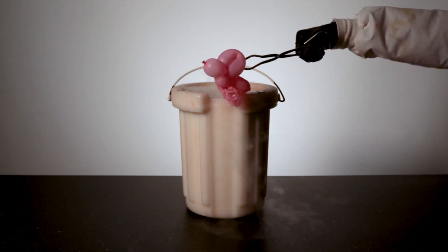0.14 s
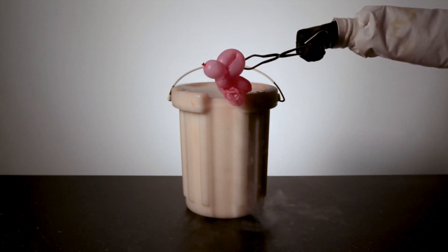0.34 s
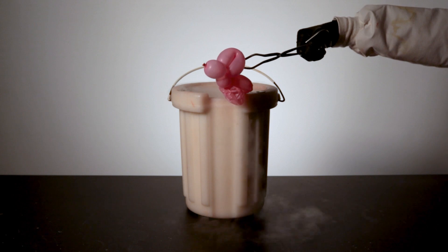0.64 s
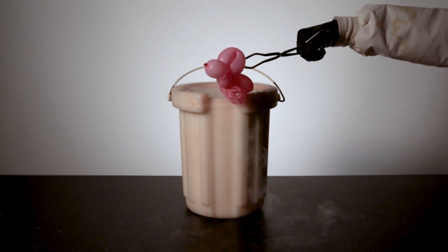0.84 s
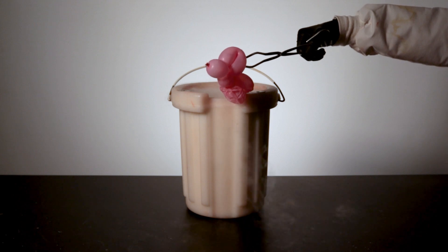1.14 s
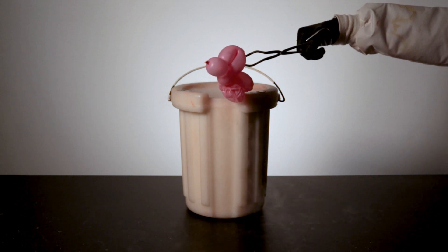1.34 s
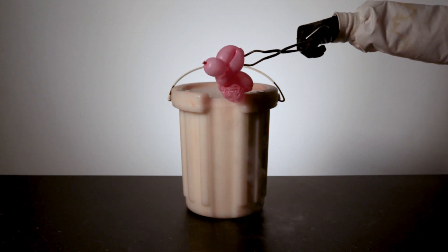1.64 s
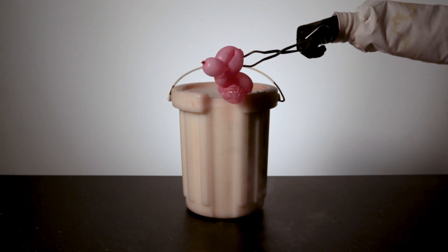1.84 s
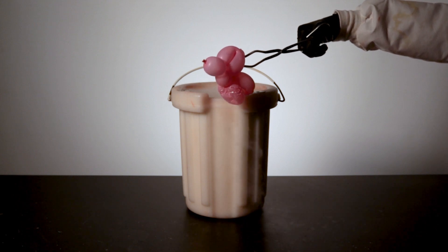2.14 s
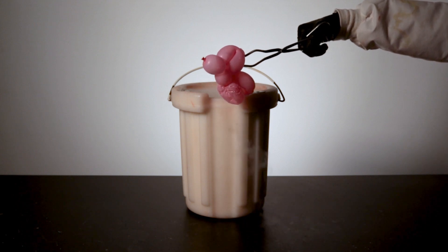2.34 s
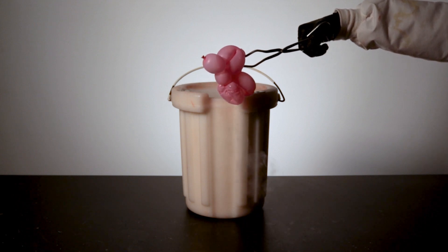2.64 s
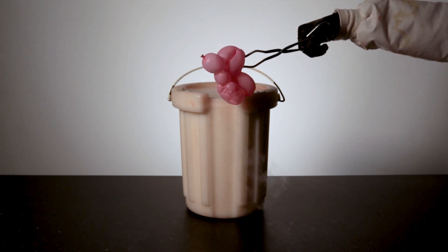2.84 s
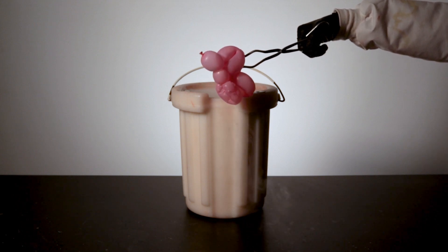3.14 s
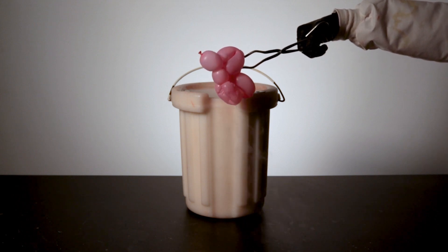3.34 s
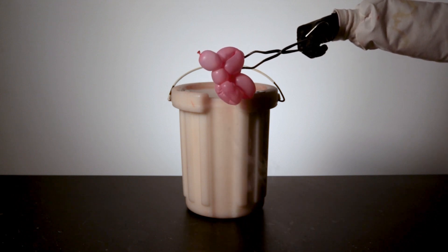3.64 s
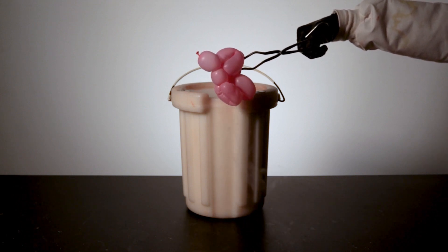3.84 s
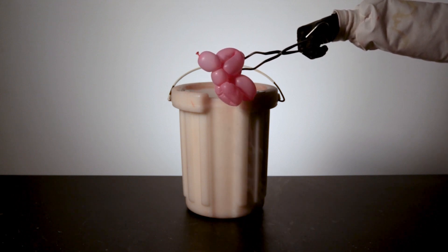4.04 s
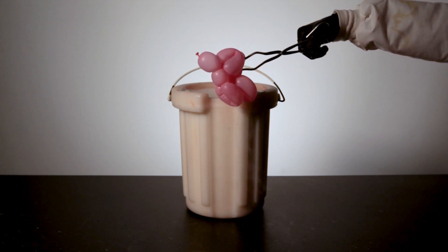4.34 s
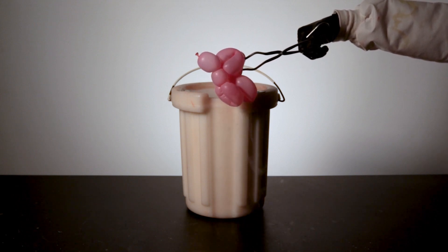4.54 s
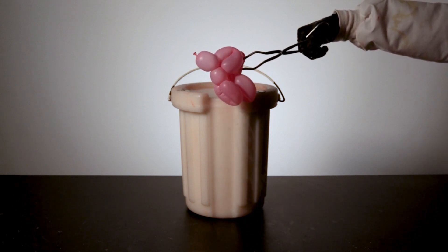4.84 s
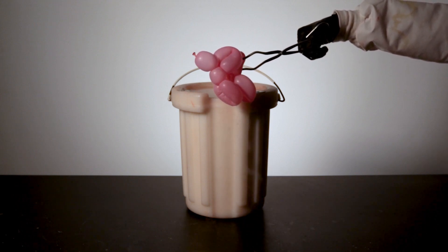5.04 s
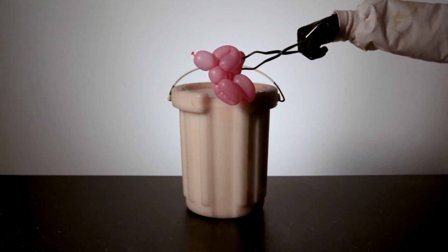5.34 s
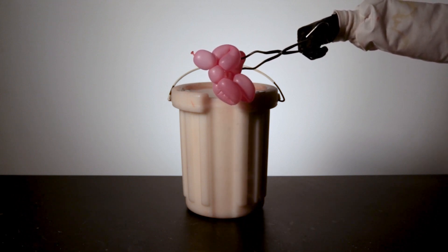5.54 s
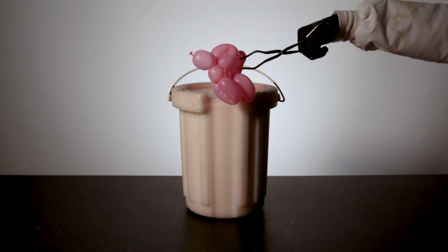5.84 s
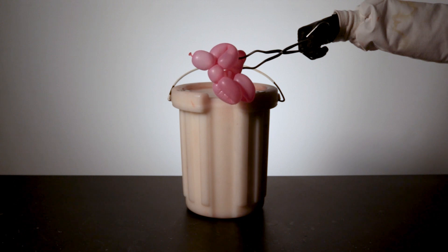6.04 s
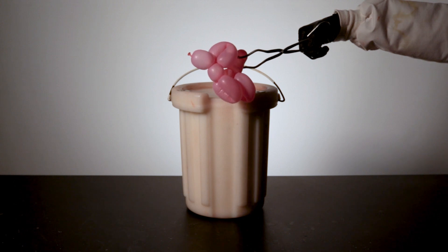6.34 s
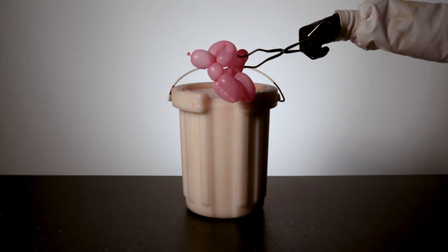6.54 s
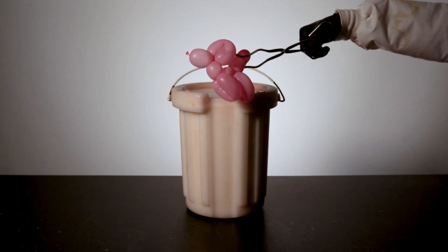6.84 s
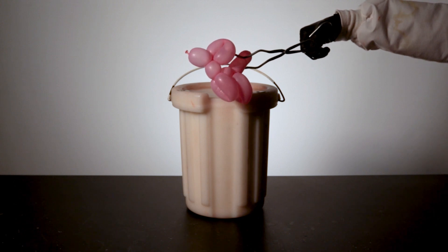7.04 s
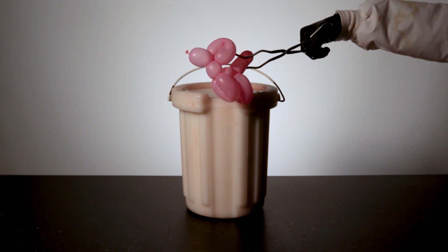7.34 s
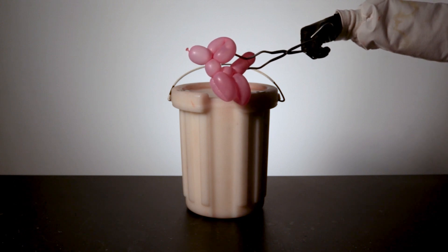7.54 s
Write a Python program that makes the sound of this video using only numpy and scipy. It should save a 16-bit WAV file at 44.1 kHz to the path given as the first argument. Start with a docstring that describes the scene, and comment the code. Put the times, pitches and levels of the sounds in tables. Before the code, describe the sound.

From the start, a frozen rubber balloon thawing over a foam bucket crackles densely: hundreds of tiny, dry, bright ticks per second at uneven levels, with larger snaps on top. Each is very short, a hard jolt with a ragged tear, some pinging high, others knocking duller and lower. From 0 to 2.3 s the snaps are lively; around 2.3 to 2.9 s they cluster louder and sharper. Strong pops continue near 3.35 and 3.84 s, with a busy flurry at 4.55 to 4.65 s and another crisp one at 5.1 s. The fine crackle then thins rapidly. A loud clack stands out at 5.86 s; afterwards only sparse, mostly faint clicks remain, except a very loud snap at 7.28 s, then tiny ticks until about 7.7 s. Quiet distant fan hiss with faint wavering low tones runs steadily underneath. Close stereo, small room, short reflections.

```python
"""A dense, bright crackle over a steady hiss thins out to lone, sharp clicks: a frozen rubber balloon
thaws above a foam bucket on a table top and swells back to shape. Each stiff crease snaps open as a
jolt plus a ragged noise tear, ringing a patch of rubber and coloured by the balloon's lobes.
Blurred first echoes and a diffuse tail make the small room; shaped noise and soft tones make a distant fan."""
import sys
import numpy as np
from scipy import signal
from scipy.fft import rfft, irfft, next_fast_len
from scipy.io import wavfile

SR = 44100
rng = np.random.default_rng(int(sys.argv[2]) if len(sys.argv) > 2 else 0)


def log_audio(samples):
    """Write samples as a 16-bit WAV file to the path given in sys.argv[1]."""
    # one column per channel
    frames = np.atleast_2d(samples).T
    # limit to full scale, then quantise
    limited = np.clip(frames, -1, 1)
    pcm = np.round(limited * 32767).astype(np.int16)
    wavfile.write(sys.argv[1], SR, pcm)


N = 338675

# Snaps that stand out, loud ones and faint late ones; energy before the lobes and the thaw colour them,
# treble is above 6 kHz, thud below: start_s, pitch_hz, energy_db, treble_over_thud_db
SINGLE_SNAPS = [(0.1067, 7540, -10.5, 4), (0.1526, 6000, -13.5, 3.5), (0.176, 8050, -13.5, 26),
                (0.2665, 1500, -18, 2.5), (0.29, 1380, -21.5, -10), (0.351, 4870, -13, 7.5),
                (0.386, 8700, -10, 9.5), (0.414, 2900, -11, 2.5), (0.4422, 9000, -8, 8.5),
                (0.5271, 5900, -13, 10), (0.67, 9350, -16, 9), (0.7114, 5700, -13.5, 9.5),
                (0.773, 2060, -5.5, -1), (1.002, 7340, -11, 20), (1.083, 3400, -10, -11),
                (1.114, 10500, -7.5, 6), (1.147, 10510, -13.5, 10), (1.2017, 9000, -11.5, 13),
                (1.2824, 2700, -12.5, 6), (1.3174, 12450, -8.5, 24), (1.3415, 8500, -10.5, 3.5),
                (1.393, 12400, -14.5, 7), (1.4054, 10500, -15, 5), (1.4462, 11300, -13, 16),
                (1.6, 1840, -7.5, 0.5), (1.7509, 2830, -12.5, 10), (1.8554, 10300, -13, 11),
                (1.8959, 10420, -13.5, 12), (2.077, 8100, -15, 10), (2.0824, 10940, -12, 24),
                (2.092, 7970, -12, 10), (2.291, 12060, -11.5, 7.5), (2.326, 9800, -3.5, 13),
                (2.4313, 3240, -17, -14), (2.5686, 2870, -13.5, -1), (2.6034, 10100, -10, 7),
                (2.6325, 5700, -9.5, 2.5), (2.6669, 5500, -12, 6), (2.7438, 7100, -4, 8.5),
                (2.7715, 6750, -13.5, 1), (2.7973, 6500, -12.5, 0), (2.8204, 9100, -4.5, 31),
                (2.8408, 8400, -8, 5), (2.8801, 4500, -9.5, 7), (2.92, 8000, -10.5, 4.5),
                (3.0675, 5810, -13.5, 0), (3.1343, 9600, -8.5, 10), (3.338, 11600, -12.5, 18),
                (3.3503, 3370, -2, -12.5), (3.3731, 2820, -11.5, 0), (3.5692, 4400, -12.5, 11),
                (3.629, 9100, -10.5, 10), (3.6664, 12600, -9.5, 5.5), (3.6946, 4660, -10, 6),
                (3.7629, 1250, -11, 4.5), (3.8292, 4830, -14, 3), (3.8392, 9500, -3, 11.5),
                (3.8948, 4130, -11.5, 1), (4.0077, 7700, -10, 8.5), (4.0873, 5170, -14.5, 6),
                (4.1409, 10200, -9.5, 9), (4.2061, 7440, -13, 2.5), (4.2378, 7800, -15.5, 7),
                (4.3227, 1460, -12.5, -5.5), (4.3477, 1340, -16, 8), (4.4153, 2730, -16.5, -4),
                (4.4411, 3300, -8, -1), (4.5422, 14380, -16, 7), (4.5677, 13220, -4.5, 20),
                (4.575, 4180, -4, -7), (4.5997, 2880, -8, -19), (4.6239, 2680, -13.5, -8),
                (4.6543, 9350, -5.5, 8.5), (4.6668, 10800, -10, 21), (4.728, 3800, -14.5, -2),
                (4.7469, 4340, -12, 6.5), (4.7821, 2160, -9, 0), (4.8306, 2780, -10.5, 2),
                (4.916, 3700, -9.5, 5), (5.024, 2000, -13, -5), (5.091, 9000, -4.5, 19),
                (5.136, 5200, -20, 3), (5.2279, 4570, -13, 10.5), (5.2465, 8760, -12, 8),
                (5.3183, 12020, -17.5, 8), (5.3793, 8300, -17, 12), (5.408, 9220, -18, 16),
                (5.42, 8010, -18.5, 12), (5.488, 7700, -16.5, 14), (5.5367, 13400, -14.5, 13),
                (5.55, 8900, -15.5, 9), (5.638, 10600, -28, 9), (5.6568, 8780, -27, 6),
                (5.675, 6850, -18.5, 15), (5.724, 9690, -24, 19), (5.7479, 13820, -18.5, 14),
                (5.7609, 11500, -14.5, 16), (5.8307, 3560, -24.5, 2), (5.8596, 2720, -3, 1),
                (5.9086, 4900, -13.5, 7), (5.9757, 9800, -18, 13), (5.982, 5430, -22, 6),
                (5.992, 10900, -17.5, 6.5), (6.092, 8610, -23, 22), (6.176, 6740, -24, 5),
                (6.1893, 5270, -25, 2), (6.2015, 2950, -24.5, 0), (6.2196, 3900, -16, 4.5),
                (6.2278, 10600, -15.5, 21), (6.311, 11710, -24, 7), (6.3175, 3380, -26, 7),
                (6.4073, 10000, -14, 8.5), (6.4465, 2750, -27, 1), (6.4627, 9150, -20.5, 3.5),
                (6.478, 12000, -25, 12), (6.625, 12300, -14, 22), (6.6734, 12450, -16.5, 16),
                (6.6846, 3940, -20, -3.5), (6.715, 9900, -24, 11), (6.7772, 12900, -19.5, 33),
                (6.821, 1770, -29, -3), (6.8707, 2780, -32, 4), (6.9466, 2740, -32.5, 3),
                (6.963, 7940, -26, 11), (7.1091, 4500, -19, -2), (7.1638, 8650, -18.5, 19),
                (7.2036, 1900, -25.5, -3), (7.2807, 3760, 0.5, 3), (7.364, 4940, -22, 6),
                (7.383, 4640, -26, 3), (7.393, 7540, -24, 4), (7.446, 5130, -22, 2.5),
                (7.5058, 12960, -25.5, 19), (7.5206, 5200, -22, 7), (7.558, 5380, -27, 6),
                (7.6034, 5260, -22, 6), (7.6754, 5120, -21, 8.5)]
# Level curve of the small crackle: time_s, level_db
CRACKLE_LEVEL = [(0.0, -42), (0.36, -45), (1.22, -42), (1.45, -44.5), (2.54, -43), (2.76, -42.5),
                 (2.87, -43), (3.27, -41), (4.28, -46), (4.66, -41), (5.18, -50), (5.86, -54.5),
                 (5.99, -56), (6.99, -69), (7.16, -64), (7.34, -65), (7.68, -80)]
# Soft rubber snaps less often and thinner: time_s, creases_per_s, low_band_db
THAW_CURVE = [(4.8, 450., 2), (5.6, 150., 0.5)]
# Low, middle and high band of a snap: from_hz, to_hz
SNAP_BANDS = [(1030, 2500), (2500, 6000), (6000, 15000)]
# How strongly and clearly a patch rings at its pitch: pitch_hz, ring_db, sharpness (centre over width)
PATCH_RING = [(1500, 21, 9.7), (3300, -1.5, 8.5), (6000, 3.5, 6)]
# A large, low-ringing patch puts more of its thud in the lowest band: pitch_hz, low_over_middle_db
THUD_SPLIT = [(1500, 2), (2200, 0.5), (2750, -10), (4500, -9), (6500, -7), (12000, -9.5)]
# Swollen balloon lobes: centre_hz, width_hz, boost_db
LOBES = [(3340, 920, 7), (4340, 520, 8.5)]
# First echoes: delay_s, left_db, right_db
FIRST_ECHOES = [(.0055, -19, -8.5), (.0065, -12.5, -30), (.0081, -14, -17.5), (.0096, -21, -27.5),
                (0.0116, -16, -37), (0.0174, -22, -39)]
# Room tail, energy before its band filter: centre_hz, t60_s, energy_db
ROOM_TAIL = [(1420, 0.21, -3.5), (2750, 0.23, -7), (6800, 0.38, -12.5), (14300, 0.15, -3)]
# Relative spectrum of fan air and hiss: pitch_hz, density_db (per Hz)
FAN_SPECTRUM = [(80, -23.5), (120, -23), (170, -13.5), (300, -5.5), (560, 0), (680, -5), (1270, -13.5),
                (2300, -11.5), (5300, -18.5), (12700, -20.5), (16500, -33)]
# Wavering fan tones, rms before the fan's pan: pitch_hz, width_hz, level_db
FAN_TONES = [(465, 7, -76.5), (584, 13, -70.5), (717, 6, -76)]

# Snap timing: swell, main slip, second slip, rustle
SIZE = 384  # samples in one burst
SWELL_S, SWELL_DB = 0.0012, -7  # length and level of the soft swell that leads into each snap
RISE_S, FALL_S = 0.0003, 0.00055
SLIP_S, SLIP_DB = 0.0009, -4  # typical delay and level of the second slip
AFTER_S, AFTER_DB = 0.002, -13  # decay time and level of the faint rustle
KICK = 1.44  # strength of the clean jolt against the ragged tear

# Snap tone
PURE_RING = 0.6  # ring dB gained per dB of treble below the thud
PURE_TILT = 0.23  # dull snaps are purer rings: low band dB gained per dB of treble
OVERTONE, OVERTONE_DB = 1.81, -9.5  # second ring of a large patch: pitch ratio, level
OVERTONE_TILT = 0.44  # second ring dB gained per dB of treble
LARGE_HZ = 4500  # patches that ring above this lose the second ring
DULL_HZ = 8100  # dull snaps fall off above this

# Snap placement
PAN_DB, PAN_SPREAD_DB = -1, 2.1  # left over right: mean, spread
PLACES = 5  # spots on the balloon, each with its own path through the room
SPREAD_RING_DB, SPREAD_RAG = -2, 0.19  # towards the walls: ring trim, share of ragged detail left

# Small crackle
SMALL_LOW_HZ, SMALL_HIGH_HZ = 1340, 14000  # range of ring pitch
SMALL_DB, SHARE_SPREAD_DB = (-11.5, -6, 1.5), 5.5  # relative energy in the three bands: mean, spread
CRACKLE_SPREAD_DB, CRACKLE_CAP_DB = 2.5, 9  # size above the smallest crease: mean before the cap, cap

# Room, fan and top edge
ECHO_BLUR_S, ECHO_ALIKE = 0.00011, 0.77
TAIL_START_S, TAIL_ALIKE = 0.0019, 0.36
FAN_DB, FAN_ALIKE = -61, 0.74  # rms of the air before its pan; left-right likeness
STEADY_HZ, STEADY_DB = 345.3, -73  # one tone holds still; rms before its pan
FAN_PAN_DB = 0.8  # left over right
TOP_HZ = 15750


def single_snaps():
    """Single creases snap: the ring pitch splits the thud into low and middle, under a given treble."""
    s, hz, db, bright_db = np.transpose(SINGLE_SNAPS)
    thud_hz, thud_low_db = np.transpose(THUD_SPLIT)
    thaw_s, _, thaw_db = np.transpose(THAW_CURVE)
    low_db = np.interp(np.log(hz), np.log(thud_hz), thud_low_db)
    low_db = low_db + np.interp(s, thaw_s, thaw_db)
    low_db = low_db + PURE_TILT * np.minimum(bright_db, 3) * (hz > SNAP_BANDS[0][1])

    def share(over_db):
        """Share of the energy, in dB, of a part that stands over_db above the other part."""
        return -10 * np.log10(1 + undb(-2 * over_db))

    thud_db = db + share(-bright_db)
    treble_db = db + share(bright_db)
    return snaps(s, hz, bright_db, thud_db + share(low_db), thud_db + share(-low_db), treble_db)


def crackle():
    """Many small creases snap at random moments, a few much louder than the rest."""
    chance, shares = rng.random((3, 8000)), rng.standard_normal((3, 8000))
    when, per_s, thin_db = np.transpose(THAW_CURVE)
    t = np.arange(N + 1) / SR
    # random gaps, stretched as the creases get rarer
    expected_count = np.cumsum(np.interp(t, when, per_s)) / SR
    s = np.interp(np.cumsum(-np.log(1 - chance[0])), expected_count, t)
    size_db = np.minimum(-CRACKLE_SPREAD_DB * np.log(1 - chance[1]), CRACKLE_CAP_DB)
    hz = SMALL_LOW_HZ * (SMALL_HIGH_HZ / SMALL_LOW_HZ) ** chance[2]
    low, middle, high = size_db + np.c_[list(SMALL_DB)] + SHARE_SPREAD_DB * shares
    low = low + np.interp(s, when, thin_db)
    grains = lobes(snaps(s, hz, high - middle, low, middle, high))
    # fewer creases share the same level
    each = grains * np.sqrt(per_s[0] / np.interp(t[:N], when, per_s))
    level_db = np.interp(t[:N], *np.transpose(CRACKLE_LEVEL))
    return each / each[:, 0].std() * undb(level_db)


def snaps(s, hz, bright_db, *bands_db):
    """Creases let go in two quick slips and a rustle, ringing their patches; slot 0 is direct, others echo."""
    chance = rng.standard_normal((len(s), SIZE + 2))
    f = np.fft.rfftfreq(SIZE, 1 / SR)
    envelope = tear_envelope(chance[:, 1:2])
    patch, dull = patch_ring(f, hz, bright_db), dull_edge(f, hz, bright_db)
    jolt_at = np.arange(SIZE) == round((SWELL_S + RISE_S) * SR)
    jolt = KICK * np.sign(chance[:, 2:3]) * jolt_at
    ragged = chance[:, 2:] * envelope
    pan_db = PAN_DB + PAN_SPREAD_DB * chance[:, 0]
    spots = 1 + np.arange(len(s)) % PLACES
    onset = np.round(np.maximum(s - SWELL_S, 0) * SR).astype(int)
    slot_size = N + SIZE
    sides = 0
    for slot, ring_trim_db, rag_share in ((0, 0, 1), (spots, SPREAD_RING_DB, SPREAD_RAG)):
        tear = rfft(jolt + rag_share * ragged) * (1 + undb(ring_trim_db) * patch) * dull
        burst = 0
        for db, edges in zip(bands_db, SNAP_BANDS):
            part = irfft(tear * band(f, *edges), SIZE)
            burst = burst + part * (undb(db) / np.linalg.norm(part, axis=1))[:, None]
        start = onset + slot * slot_size
        index = (start[:, None] + np.arange(SIZE)).ravel()
        panned = [burst * undb(side * pan_db / 2)[:, None] for side in (1, -1)]
        sides = sides + np.array([np.bincount(index, x.ravel(), (PLACES + 1) * slot_size) for x in panned])
    return np.reshape(sides, (2, PLACES + 1, -1))[..., :N]


def tear_envelope(chance):
    """A soft swell, a slip, a second slip after a varying delay and a faint rustle."""
    t = np.arange(SIZE) / SR - SWELL_S

    def slip(u):
        """One slip: quick rise, exponential fall."""
        u = np.maximum(u, 0)
        return (1 - np.exp(-u / RISE_S)) * np.exp(-u / FALL_S)

    later = SLIP_S * np.exp(0.33 * chance)
    swell = undb(SWELL_DB) * (1 + t / SWELL_S) ** 2
    rustle = undb(AFTER_DB) * np.exp(-t / AFTER_S)
    return slip(t) + undb(SLIP_DB) * slip(t - later) + np.where(t < 0, swell, rustle)


def patch_ring(f, hz, bright_db):
    """A patch of rubber resonates at its own pitch; a large one adds a second, higher ring."""
    at_hz, ring_db, sharp = np.transpose(PATCH_RING)
    pitch, sharp = hz[:, None], np.interp(hz, at_hz, sharp)[:, None]
    second = undb(OVERTONE_DB + OVERTONE_TILT * np.minimum(bright_db, 8))[:, None]
    second = second / (1 + (pitch / LARGE_HZ) ** 6)
    patch = ring(f, pitch, sharp) + second * ring(f, OVERTONE * pitch, sharp)
    strength_db = np.interp(hz, at_hz, ring_db) + PURE_RING * np.clip(-bright_db, 0, 10)
    return patch * undb(strength_db)[:, None]


def dull_edge(f, hz, bright_db):
    """Dull snaps lose treble; treble over 3 dB lifts the edge dB for dB, and a high ring lifts it too."""
    edge = np.maximum(DULL_HZ * undb(np.maximum(bright_db - 3, 0)), 2 * hz)
    return 1 / (1 + 1j * f / edge[:, None]) ** 3


def lobes(x):
    """The swollen lobes of the balloon resonate and colour every snap."""
    return shaped(x, lambda f: 1 + sum((undb(db) - 1) * ring(f, c, c / w) for c, w, db in LOBES))


def room():
    """Table and walls answer with blurred first echoes, then a diffuse tail that dies band by band."""
    t = np.arange(SR // 2) / SR
    out = np.zeros((2, len(t)))
    for s, *db in FIRST_ECHOES:
        blur = np.exp(-((t - s) / ECHO_BLUR_S) ** 2) * pair(len(t), ECHO_ALIKE)
        out += undb(db)[:, None] * blur / np.sqrt((blur ** 2).sum(axis=1, keepdims=True))
    for hz, t60, db in ROOM_TAIL:
        fall = np.clip(t / TAIL_START_S - 1, 0, 1) * undb(-60 * t / t60)
        noise = pair(len(t), TAIL_ALIKE) * fall / np.sqrt((fall ** 2).sum())
        out += undb(db) * shaped(noise, lambda f: ring(f, hz, 0.84))
    return out


def fan():
    """Distant fan and hiss: steady broad noise, narrow noise bands as wavering tones, one steady sine."""
    hz, db = np.transpose(FAN_SPECTRUM)
    air = shaped(pair(N, FAN_ALIKE), lambda f: undb(np.interp(np.log(f + 1), np.log(hz), db)))
    out = air / air.std() * undb(FAN_DB)
    for c, w, tone_db in FAN_TONES:
        tone = shaped(pair(N, FAN_ALIKE), lambda f: ring(f, c, c / w))
        out += tone / tone.std() * undb(tone_db)
    out += np.sqrt(2) * undb(STEADY_DB) * np.sin(2 * np.pi * STEADY_HZ * np.arange(N) / SR)
    return out * undb([[FAN_PAN_DB / 2], [-FAN_PAN_DB / 2]])


def undb(db):
    """dB to gain."""
    return 10 ** (np.asarray(db) / 20)


def ring(f, hz, sharp):
    """Causal response of one resonance, gain about 1 at its centre."""
    return 1 / (1 + 1j * sharp * (f / hz - hz / (f + 1)))


def band(f, lo_hz, hi_hz):
    """Response of a causal band-pass with steep edges."""
    b, a = signal.butter(3, [lo_hz, hi_hz], "band", analog=True)
    return signal.freqs(b, a, f)[1]


def shaped(x, gain):
    """Colour x by gain(Hz)."""
    n = next_fast_len(x.shape[-1] + 4096)
    return irfft(rfft(x, n) * gain(np.fft.rfftfreq(n, 1 / SR)), n)[..., :x.shape[-1]]


def pair(n, alike):
    """Left and right noise that share a part: alike is their correlation."""
    mid, side = rng.standard_normal((2, n))
    alike = np.clip(alike, 0, 1)
    return np.sqrt((1 + alike) / 2) * mid + np.sqrt((1 - alike) / 2) * side * np.array([[1], [-1]])


def scene():
    """Direct snaps, their echoes from each spot of the balloon, and the fan under them."""
    rubber = lobes(single_snaps()) + crackle()
    echoes = sum(signal.fftconvolve(rubber[:, 1 + k], room(), axes=1)[:, :N] for k in range(PLACES))
    return rubber[:, 0] + echoes + fan()


def record(dry):
    """A steep low-pass cuts the top of the treble."""
    return signal.sosfilt(signal.ellip(10, .2, 60, TOP_HZ, fs=SR, output="sos"), dry)


dry = scene()
out = record(dry)
log_audio(out)
```